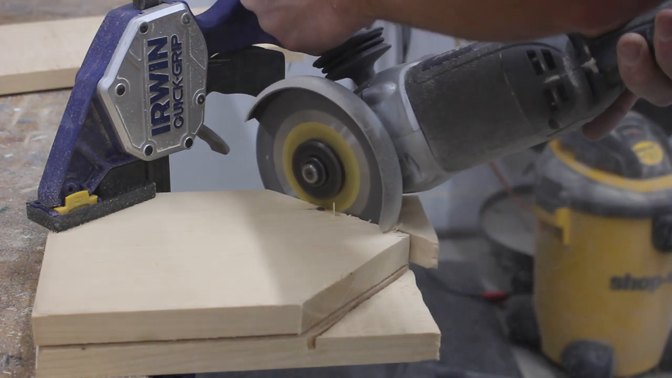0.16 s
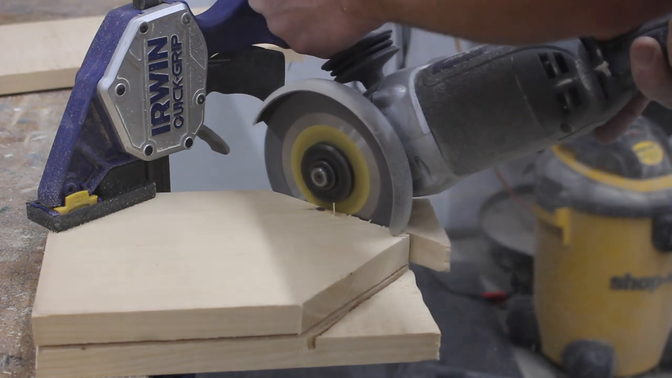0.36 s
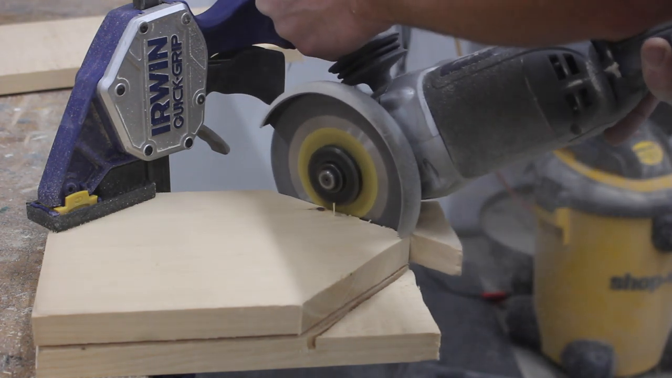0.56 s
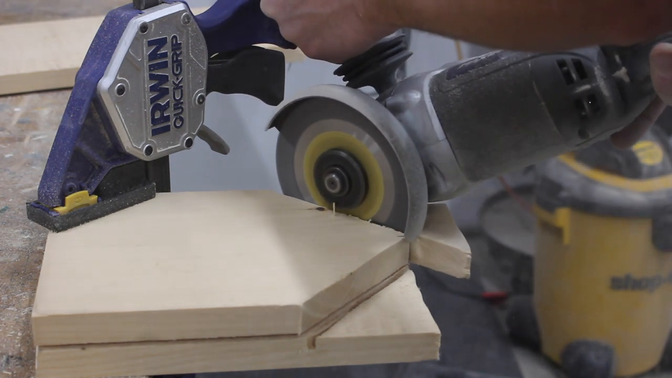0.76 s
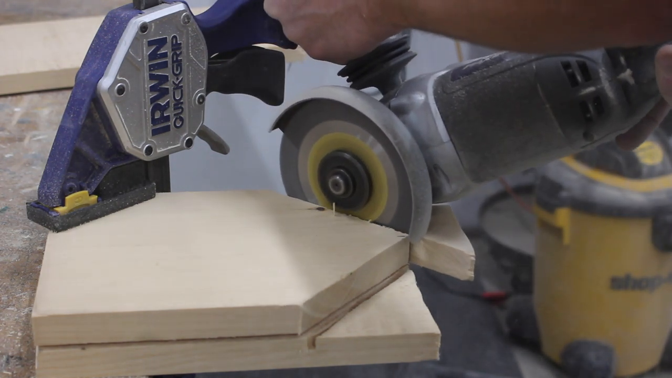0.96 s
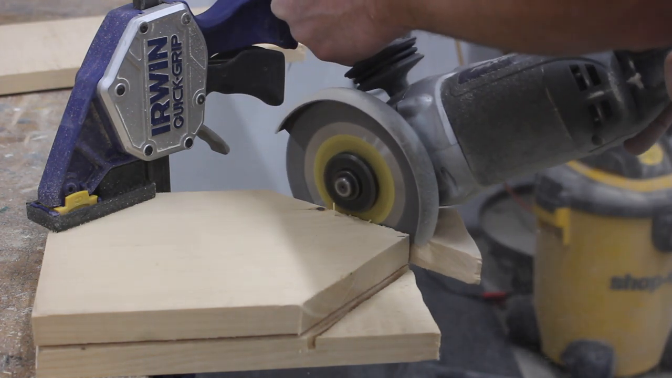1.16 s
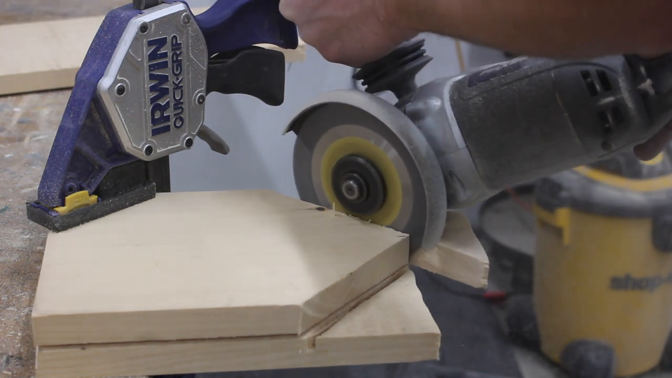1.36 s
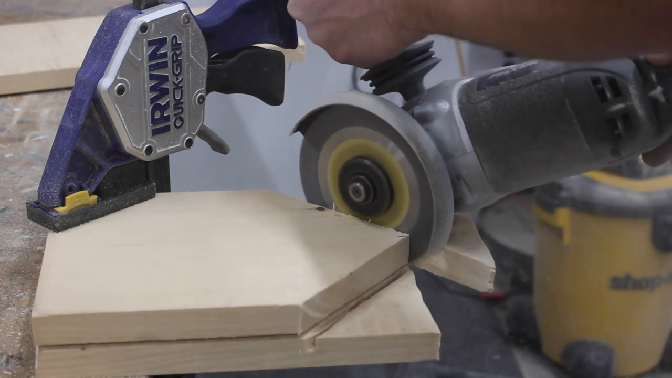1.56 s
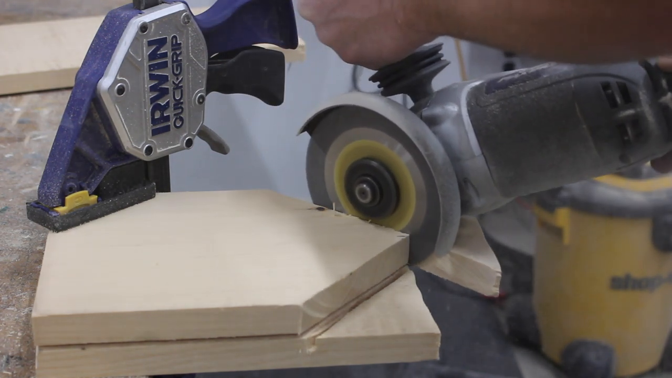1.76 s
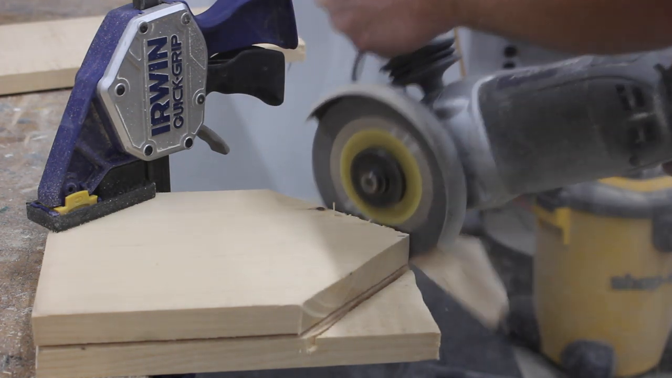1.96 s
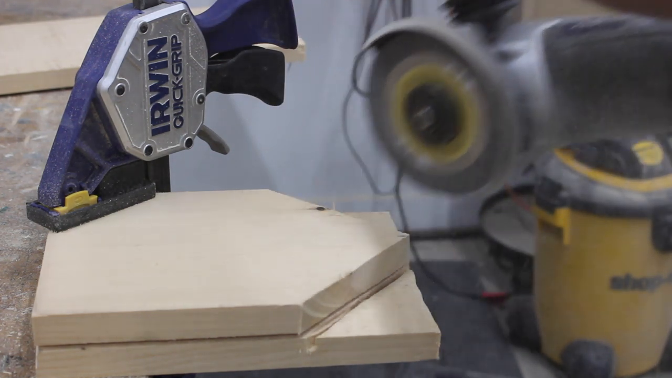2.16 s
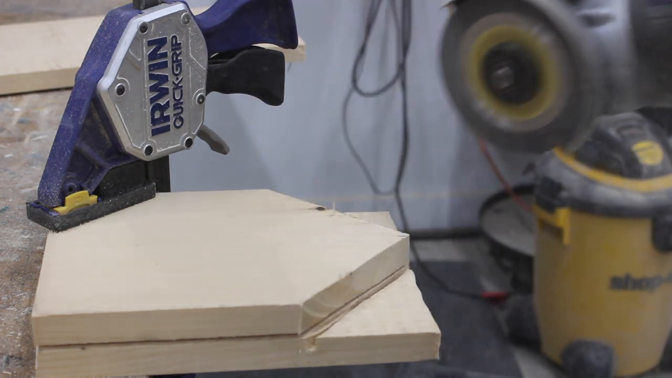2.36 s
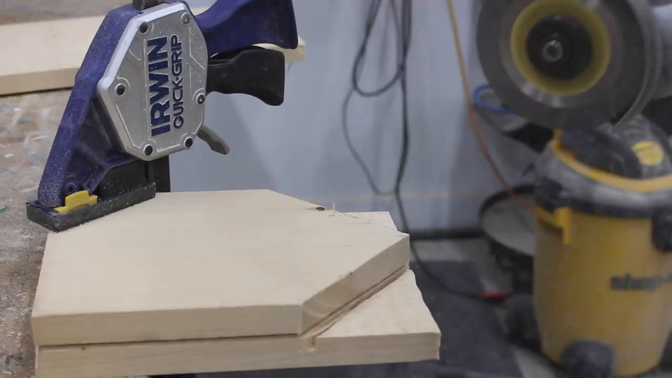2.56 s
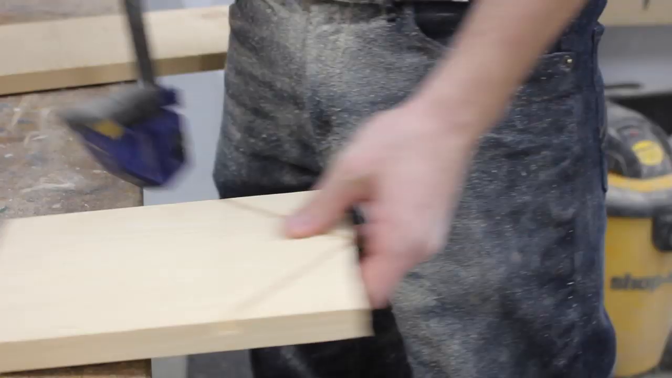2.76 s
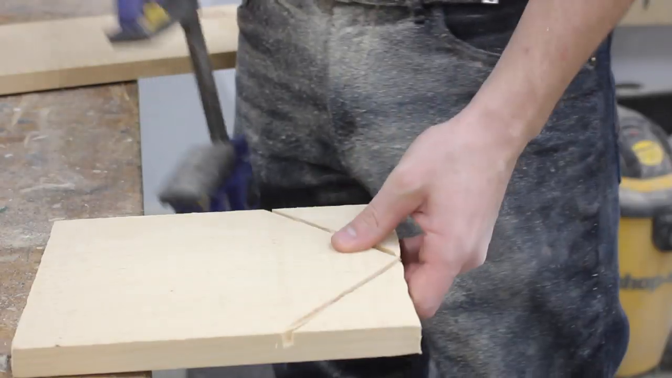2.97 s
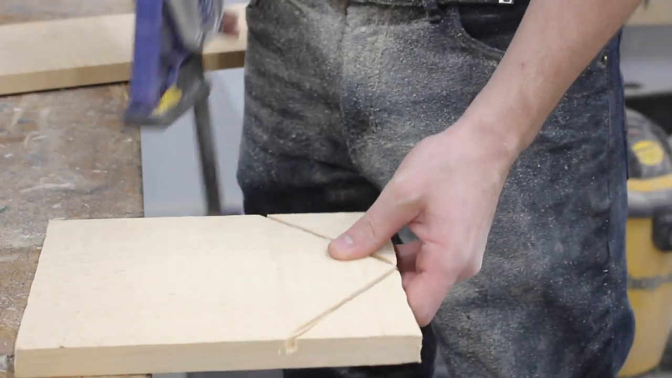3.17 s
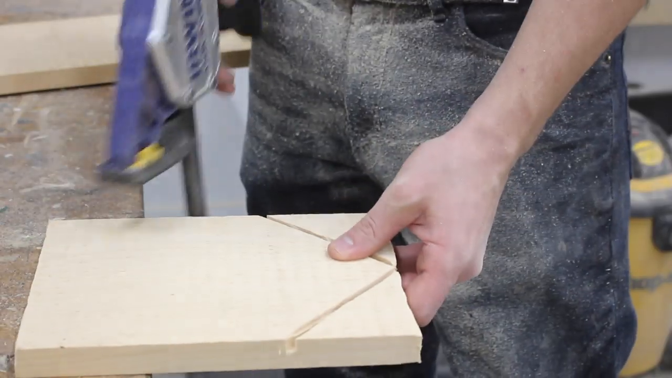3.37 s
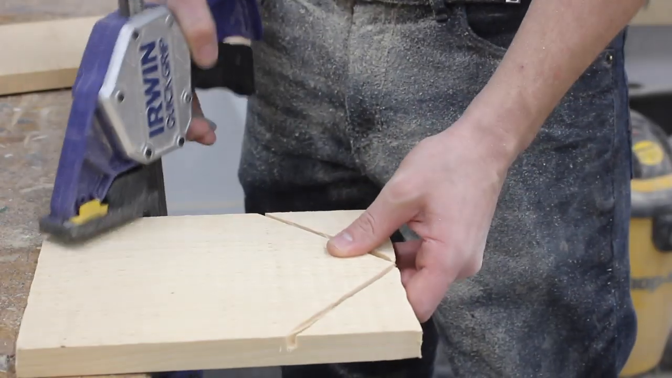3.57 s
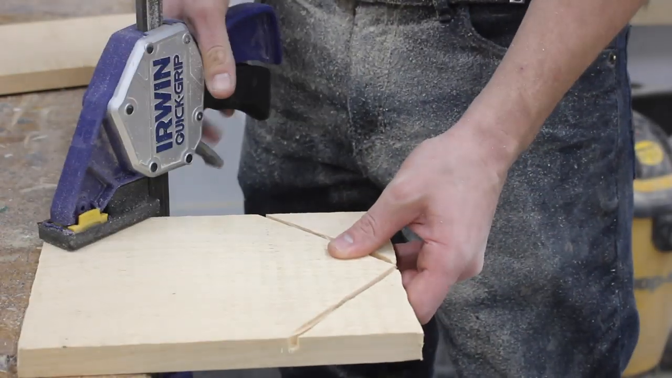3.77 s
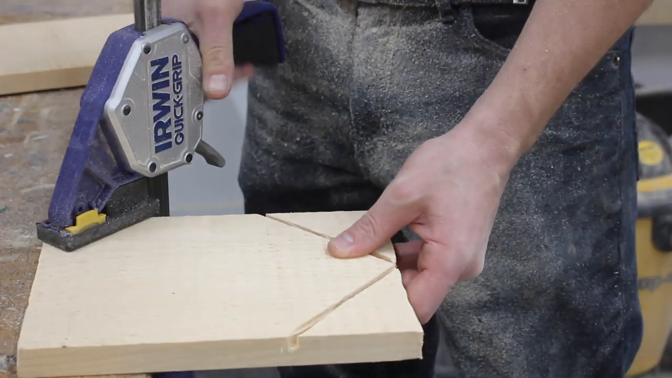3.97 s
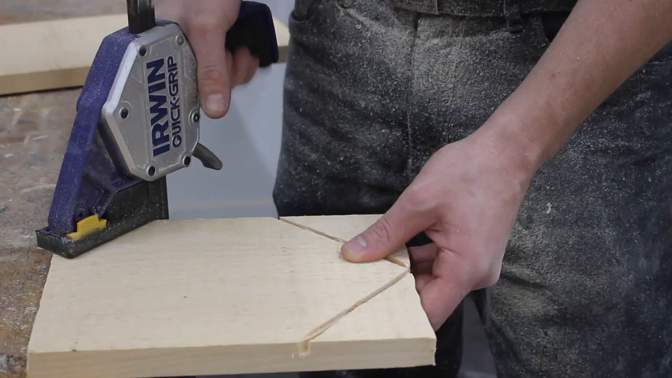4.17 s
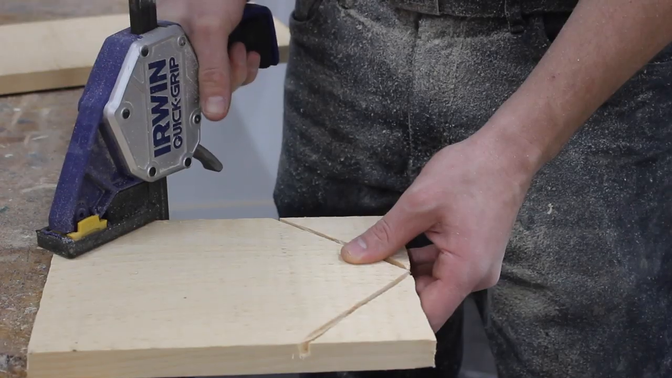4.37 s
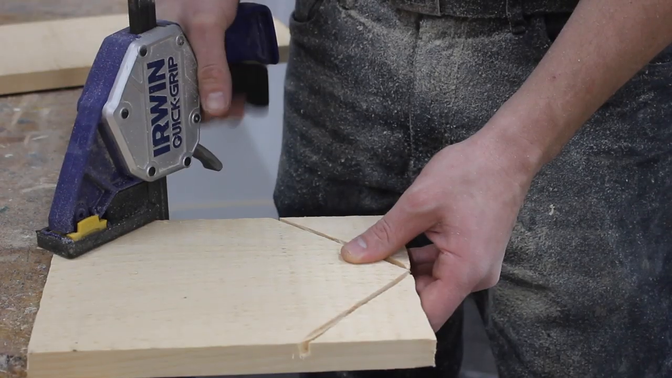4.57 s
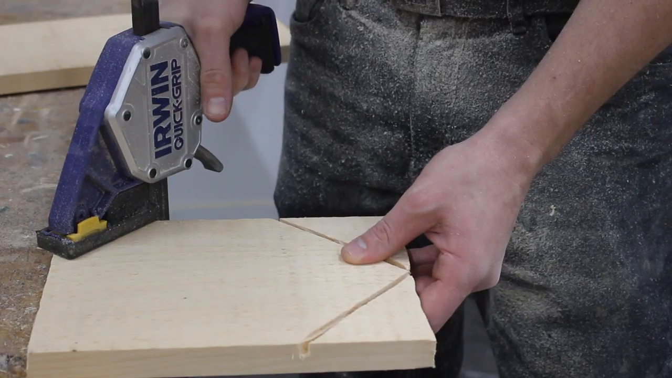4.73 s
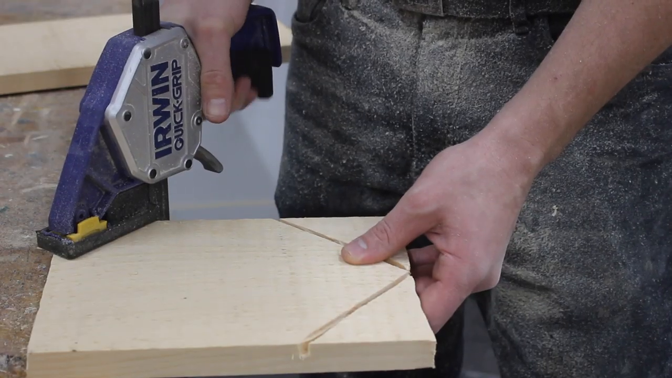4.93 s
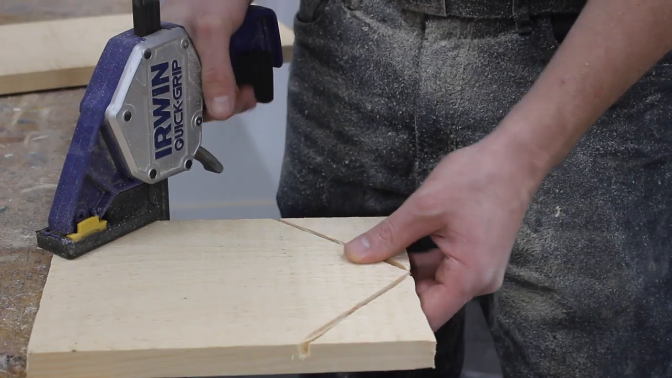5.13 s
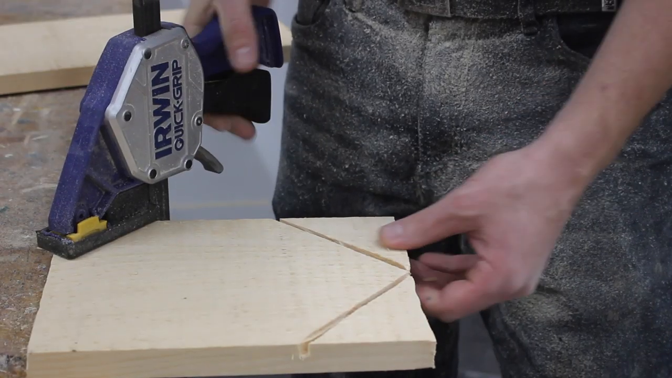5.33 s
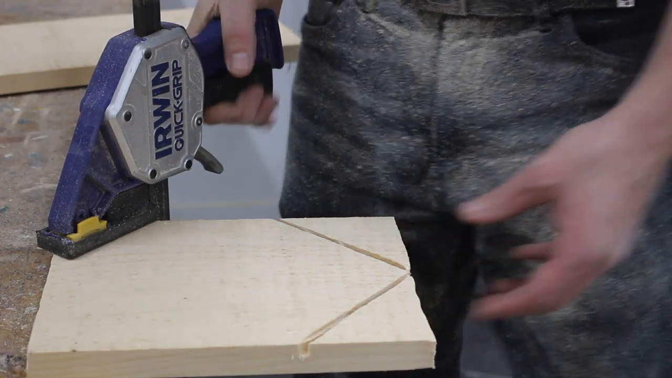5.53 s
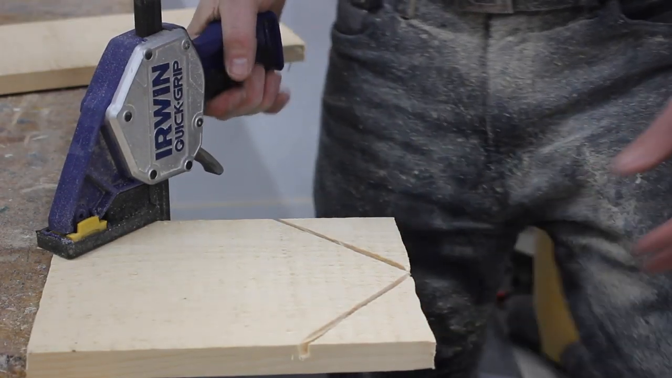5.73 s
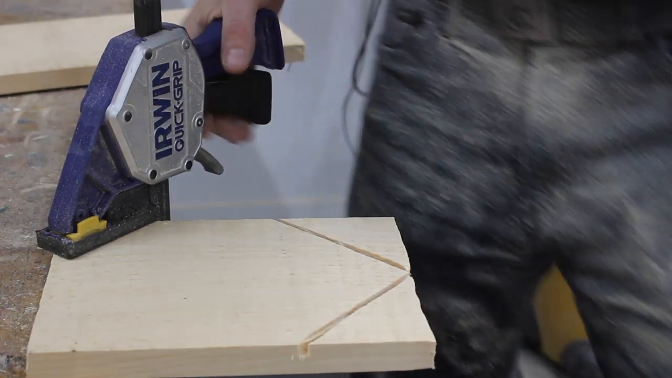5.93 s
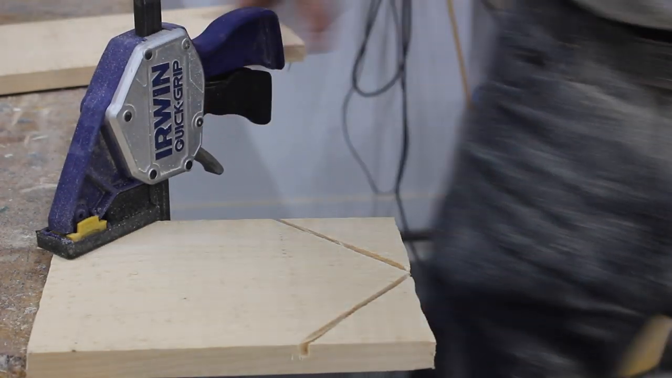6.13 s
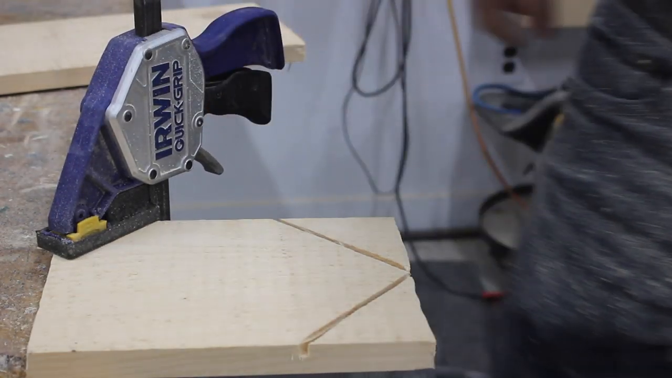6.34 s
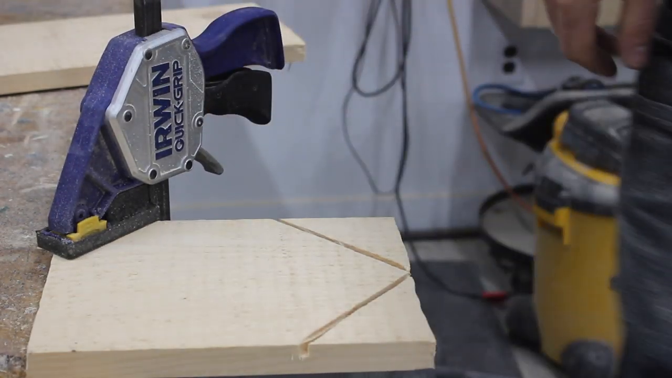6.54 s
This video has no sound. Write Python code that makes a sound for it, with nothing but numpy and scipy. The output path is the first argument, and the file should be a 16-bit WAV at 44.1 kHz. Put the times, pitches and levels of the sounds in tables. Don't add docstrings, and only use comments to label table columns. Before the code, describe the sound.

From 0 to about 2 seconds an angle grinder cuts wood at close range, a loud, wavering scream of many whining tones over dense fibrous rasp, with sharp chip ticks near 0.3, 0.7 and 1.6. Around 2.0 it breaks free and is switched off; the whine slides down and thins while loose gears rattle in the housing, until an abrupt cut at 2.85. Quiet handling follows in a small workshop. Faint clicks at 3.1 and 3.3 precede a hard plastic-and-wood knock at 3.57, with the pad grinding briefly on the grain. From 3.8 to 5.3 the clamp is squeezed: bright snaps at 4.04, 4.37 and 4.68, clacks, squeaky scuffs, lever drops at 5.0 and 5.64, bench thumps and faint steel ringing. Soft rustling continues, with a firm knock at 6.0, then a tiny click near 6.44 over low machine hum.

```python
import sys
import numpy as np
from scipy import signal
from scipy.fft import rfft, irfft
from scipy.io import wavfile

SR = 44100
rng = np.random.default_rng(int(sys.argv[2]) if len(sys.argv) > 2 else 0)


def generate_wav(sig):
    pcm = np.round(np.clip(np.atleast_2d(sig).T, -1, 1) * 32767).astype(np.int16)
    wavfile.write(sys.argv[1], SR, pcm)


def to_linear_factor(level_db):
    exponent = np.asarray(level_db, float) / 20
    return 10 ** exponent


N = 291060
TIME = np.arange(N) / SR

# time in seconds, turns per second.
SPINDLE = [(0, 173.7), (.29, 173.5), (.43, 172.3), (.7, 170.6), (.86, 168.7), (1.8, 168.4), (1.96, 170.8)]
# time in seconds, level in dB.
LOAD = [(0, -20.5), (.43, -20), (1.39, -22), (1.95, -22), (2.07, -23.5), (2.19, -24), (2.82, -24.5)]
# frequency in Hz, level in dB per Hz.
RASP_CUT = [(53, -69), (90, -42), (161, -30), (238, -27), (343, -20), (399, -21.5), (454, -15), (745, -12),
            (1010, -7.5), (1250, -11.5), (1360, -9), (4760, -3), (7990, -9), (10800, -7.5), (15600, -24.5)]
RASP_FREE = [(53, -78), (90, -47.5), (350, -22.5), (435, -18), (505, -18.5), (867, -8.5), (1660, -12.5),
             (1840, -8), (3160, -6.5), (4280, -2), (5540, -7.5), (7330, -3.5), (8530, -10.5), (10400, -2.5),
             (15600, -31)]
RASP_EDGES_HZ = [40, 850, 6300, 19000]
# order, top in dB, loudest moment in seconds, swing in dB.
ORDERS_IN_CUT = [(1, -57, 1.4, 1), (2, -51.5, 1.0, 4), (2.72, -49.5, .7, 10), (3, -47, 1.0, 12),
                 (6, -43, 1.0, 4), (8, -46, 1.4, 4), (9, -39, .4, 12), (12, -40, .2, 5), (13, -38, .2, 8),
                 (15, -33.5, .2, 6.5), (16, -32, .12, 18), (18, -43, .1, 3), (20, -39, 0, 14),
                 (21, -35.5, .1, 14), (22, -44, .1, 4), (24, -43, 1.4, 1), (27, -43, 1.4, 3),
                 (28, -41, .2, 8), (29, -47, 1.4, 8), (33, -44, 1.1, 7), (36, -48, 1.1, 9),
                 (51, -53, 1.4, 4), (63, -54, 1.3, 12), (69, -55, 1.4, 7), (81, -60, 1.3, 7)]
SURGING = [2, 9, 15, 63]
# time in seconds, level in dB.
GEAR = [(0, -36.5), (.4, -41), (.6, -44), (.75, -54), (.86, -40), (1.25, -47), (1.8, -50), (1.93, -43),
        (2.07, -39), (2.2, -49), (2.33, -56), (2.5, -51), (2.62, -56), (2.85, -63)]
# order, time in seconds, level in dB.
FLARES = [(6, 1.98, -40), (6, 2.08, -41), (21, 2.07, -38), (22, 2.05, -35), (22, 1.48, -37),
          (22, 1.72, -38), (22, 1.88, -36), (27, 2.08, -35), (19, .5, -41), (19, .64, -41), (15, 1.4, -41),
          (15, 1.62, -41), (13, 1.4, -41), (13, .4, -38), (29, .95, -30), (32, .95, -37), (26, 1.12, -40),
          (29, 1.66, -37), (29, 1.76, -32), (32, 1.75, -39), (25, 2.06, -36), (28, 2.03, -35),
          (27, 2.33, -39), (28, 2.42, -40), (29, 2.52, -39), (28, 2.6, -40), (30, 2.6, -41)]
# time in seconds, level in dB.
BLADE_NOTE = [(.33, -60), (.42, -34), (.5, -37), (.6, -36), (.68, -43), (.8, -37), (.96, -35), (1.03, -70)]
# frequency in Hz, width in Hz, level in dB.
GUARD = [(4410, 340, 0.5), (4970, 260, 5), (6300, 400, -5), (7050, 260, -2), (10200, 700, -5)]
# time in seconds, level in dB.
GUARD_LOW = [(2.6, 3), (2.7, -9)]
# time in seconds, peak in dB.
CHIPS = [
    (0.0893, -10),
    (0.2824, -6),
    (0.296, -7),
    (0.678, -9),
    (0.713, -10),
    (0.7376, -4.5),
    (1.5894, -8),
    (1.6811, -9),
]
# time in seconds, peak in dB.
SLACK = [(2.0358, -15), (2.0622, -12), (2.0807, -8), (2.1005, -9), (2.1292, -13), (2.157, -11),
         (2.1834, -13), (2.205, -10), (2.285, -14), (2.298, -14), (2.3217, -14), (2.334, -13), (2.352, -15),
         (2.385, -10), (2.406, -10), (2.4229, -12), (2.4423, -10), (2.4658, -11), (2.4886, -12),
         (2.5102, -18), (2.531, -13), (2.576, -12.5), (2.6196, -11.5), (2.6395, -11), (2.6853, -12),
         (2.7057, -15), (2.728, -10), (2.7456, -17), (2.7691, -18), (2.784, -15), (2.8322, -11)]
# frequency in Hz, level in dB, t60 in seconds.
HOUSING = [(4720, -4, 0.0074), (4860, -3, 0.029), (6120, -2, .008), (6600, -1, 0.0093), (7210, 0.5, 0.015),
           (7400, -6, 0.005), (7720, -5.5, 0.0054), (10200, 4.5, 0.006), (10540, 5.5, 0.0051),
           (11100, 1, 0.0044)]

SWITCH_OFF_S, AIR_DRAG_PER_S = 2.04, .298
CUT_S, CUT_FADE_S = 2.852, 0.0097
LIMIT = .36
BLADE_HZ, BLADE_WANDER_TURNS = 3308, .12
DEPTH_SPAN_S, SURGE_DB, SINK_DB = 0.58, 0, -10
BREAK_OUT_S, COAST_S = [1.83, 2.02], [2.095, 2.09]
COAST_DB, COAST_DB_PER_ORDER, UNBAFFLED_DB = -53, -.6, -16.5
RING_HZ, RING_WIDTH_HZ = 3298, 14
RING_DB, RING_REST_DB = -23, -51
FLARE_S = .05
AIR_DB, AIR_FOLLOWS, DRONE_DB, DRONE_FOLLOWS = -36, 1.6, -43.5, 0.69
TOOTH_PATTERN = .38
GUARD_DB = -48
TICK_TOP_DB, TICK_TOP_DB_PER_S = -15, -8

# time in seconds, peak in dB, bench in dB.
SNAPS = [(3.09, -43, -59), (3.2948, -27, -56), (3.5744, -6, -35), (3.714, -19.5, -38), (3.8124, -20.5, -23),
         (3.8562, -17.5, -48), (3.8663, -14.5, -48), (3.8765, -21, -47), (4.0424, -8.5, -37),
         (4.0835, -20, -50), (4.338, -14.5, -40), (4.399, -30, -50), (4.374, -3.5, -31),
         (4.6784, -5, -25.5), (4.8712, -22.5, -50), (5.9024, -27, -40), (5.9683, -26, -41),
         (6.009, -9, -17), (6.442, -27, -59)]
# time in seconds, peak in dB, bench in dB.
TAPS = [(3.2908, -31, -38.5), (3.4353, -35, -50), (3.5711, -8.5, -15.5), (4.0298, -30, -34),
        (4.0835, -25, -37), (3.3015, -34, -33.5), (3.64, -25, -40), (3.696, -27, -46), (3.792, -28, -37),
        (4.3645, -26, -41), (4.8708, -25, -25), (5.537, -41, -30), (4.3507, -27, -44), (4.4417, -28, -20),
        (6.194, -32, -41)]
# time in seconds, peak in dB, bench in dB.
LEVER_DROPS = [
    (4.2239, -29, -28),
    (4.2848, -19.5, -28),
    (4.6777, -11.5, -40),
    (4.9918, -6, -21),
    (5.2843, -17, -40),
    (5.6357, -7, -20.5),
]
# time in seconds, peak in dB, bench in dB.
CLACKS = [
    (4.5846, -26, -21),
    (4.6258, -12.5, -19),
    (4.9071, -29, -22.5),
    (5.2844, -15, -13),
]
# time in seconds, peak in dB, bench in dB.
TICKS = [
    (4.253, -41, -70),
    (5.0083, -45, -70),
    (5.2617, -40, -73),
    (5.3964, -39, -70),
    (5.6538, -36, -70),
    (5.8773, -44, -73),
    (5.9806, -39, -70),
    (6.0474, -42, -70),
]
# time in seconds, peak in dB.
CATCHES = [
    (3.814, -25),
    (4.321, -24),
    (4.0425, -6),
    (4.0565, -27),
    (4.374, -10.5),
    (4.6258, -12.5),
    (4.6784, -11.5),
    (4.237, -20.5),
    (4.292, -19),
    (4.304, -18),
]
# time in seconds, peak in dB.
NUDGES = [
    (4.2243, -23.5),
    (4.237, -32),
    (4.2851, -17),
    (4.295, -25),
    (4.446, -32),
    (5.537, -30.5),
    (5.556, -36),
    (5.573, -37),
]
# time in seconds, Hz, level in dB, t60 in seconds.
BAR_RINGS = [(3.866, 9150, -50, 0.2), (4.7, 133, -30, .6), (4.99, 1175, -34, .7), (5.286, 1020, -39, 0.65),
             (5.637, 1165, -33, .8), (5.291, 341, -21, .5), (5.3, 172, -28, .35), (3.571, 1500, -15, .03),
             (5.178, 350, -38, .4), (6.018, 175, -26, .4), (3.7, 179, -23, .35), (3.578, 179, -26, .3),
             (3.434, 2455, -31, .025), (3.434, 1100, -32, .035), (4.084, 2230, -29, .1),
             (5.538, 570, -30, .1)]
# frequency in Hz, level in dB, t60 in seconds.
PLASTIC = [(2910, 6, 0.0051), (3290, 2.5, 0.0072), (3960, 0.5, 0.011), (4700, -7.5, 0.019),
           (5220, 5.5, 0.0046), (6200, -6, 0.013)]
WOOD = [(720, -3.5, 0.018), (1057, 7, 0.0087), (1490, -5, 0.018), (1920, 3, 0.013)]
STEEL = [(7340, 3.5, 0.0064), (8950, 2.5, 0.0027), (10080, -0.5, 0.0038), (12400, -15, 0.0014),
         (15200, -17, 0.00092)]
BENCH = [(130, -3, .18), (178, 0, .2), (220, -5, .15), (293, -3, .16), (342, -1, .18), (418, -5, .12)]
GRIP = [(750, -9.5, 0.019), (1122, 0, 0.02), (2060, -11.5, 0.027), (3430, -6, 0.012)]
PAWL = [(5400, 2, 0.0072), (6000, -3.5, 0.011)]
JAW = [(338, -5, 0.048), (477, -9.5, 0.023), (710, -2, 0.026), (956, 1, 0.025), (1300, -10, 0.011)]
# start and hold in seconds, then bench boom, board drag and bar slide in dB.
MOVES = [(2.833, 0.052, -45.5, -51, -50), (3.281, 0.023, -47, -44.5, -50), (3.419, 0.031, -60, -52, -56.5),
         (3.567, 0.14, -31, -30, -35.5), (3.69, 0.033, -30.5, -35, -46), (3.852, 0.036, -47, -46, -42.5),
         (4.073, 0.032, -39, -38.5, -35.5), (4.214, 0.022, -41, -44, -45), (4.28, 0.036, -34, -45, -37.5),
         (4.37, .05, -38, -43, -41), (4.429, .05, -35.5, -38.5, -35), (4.568, 0.11, -30.5, -42, -46),
         (4.72, 0.081, -35.5, -38, -37), (4.854, 0.047, -40, -39.5, -47), (4.933, 0.095, -32.5, -52, -43.5),
         (5.158, 0.18, -38, -43, -48), (5.287, 0.11, -31.5, -42.5, -41.5), (5.525, 0.037, -39, -55, -58),
         (5.621, 0.048, -37, -38, -39), (5.78, 0.42, -46.5, -46.5, -44.5), (5.994, 0.068, -32, -40, -40),
         (6.18, 0.12, -51, -43, -38)]
# frequency in Hz, level in dB per Hz.
BOOM = [(15, -58), (25, -18), (151, -14.5), (179, -0.5), (256, -12), (285, -6.5), (343, 0.5), (472, -10.5),
        (600, -8), (780, -28), (1320, -120)]
# frequency in Hz, width in Hz, level in dB.
DRAG = [(640, 400, -4.5), (1105, 420, 0), (1480, 460, -2), (1990, 730, -7)]
SLIDE = [(2320, 1000, -5.5), (3640, 380, -3), (4030, 210, 2.5), (5200, 1500, -2), (6310, 1240, -3.5),
         (8340, 4600, -25)]
# start and end in seconds, level in dB, squeak in dB.
SCUFFS = [(3.855, 3.873, -52, 17.5), (4.046, 4.05, -38, 6), (4.218, 4.24, -43, 7.5), (4.268, 4.284, -47, 0),
          (4.286, 4.322, -38, 4), (4.382, 4.41, -49, 0), (4.564, 4.58, -46, 0), (4.582, 4.615, -38, 2),
          (4.628, 4.64, -45, 16), (4.69, 4.74, -53, 0), (4.856, 4.87, -53, 0), (4.912, 4.935, -37, 2.5),
          (4.995, 5.09, -51, -8), (5.173, 5.185, -46.5, 7), (5.258, 5.278, -44.5, 4), (5.31, 5.45, -50, -8),
          (5.65, 5.71, -49, -5), (5.735, 5.77, -47.5, 10), (5.81, 5.96, -52, 0), (5.972, 6.013, -45, 4),
          (6.013, 6.125, -47.5, -4), (6.161, 6.27, -46.5, 6), (6.278, 6.325, -45, 11)]
# frequency in Hz, level in dB per Hz.
SCUFF = [(5500, -21), (6900, 2), (8000, -9), (8800, 0), (9600, -5), (10300, 0), (11100, -5), (12800, -7),
         (14200, -19), (15700, -21)]
RUSTLE = [(5500, -20), (7000, 1), (8600, -6), (9400, -3), (11300, -1), (12500, -6), (14500, -12),
          (15800, -22)]
# frequency in Hz, width in Hz, level in dB.
SQUEAK = [(2830, 3100, -4), (4540, 1230, 1), (5900, 610, 0.5)]
# frequency in Hz, width in Hz, level in dB.
SEAT = [(810, 160, -3.5), (1510, 380, 1.5)]
# time in seconds, level in dB.
SEATING = [(3.572, -90), (3.58, -27), (3.62, -36), (3.66, -27), (3.72, -38), (3.85, -40.5), (4.0, -57),
           (4.05, -86)]
# time in seconds, level in dB.
ROOM_TONE = [(2.85, -56), (3.25, -64.5), (3.6, -56.5), (4.5, -48.5), (5.5, -45.5), (6.6, -45.5)]
# frequency in Hz, level in dB per Hz.
TONE = [(15, -47), (25, -16), (126, -22), (240, -5.5), (332, -15.5), (369, -14.5), (584, -16.5),
        (2570, -22.5), (2860, -21), (15600, -32)]
# frequency in Hz, width in Hz, level in dB.
HUM = [(128.8, 3.1, -6), (80, 9.3, -8.5)]

# plastic, wood and steel in dB.
SNAP_MIX, TAP_MIX, CLACK_MIX, DROP_MIX = (0, -11.5, -19.5), (-1.7, 0, -29), (7.7, -4, -2.1), (-12, -17, -42)
TICK_MIX = (-12, -30, 0)
MOVE_ATTACK_S = 0.014
SAG_DB_PER_S, RELEASE_DB_PER_S = (46, 6, 2), (80, 59.5, 71)
RUSTLE_FROM_S = 5.6
ROOM_T60_S, ROOM_DB = 0.57, -14.5
TOP_HZ, TOP_LEAK_DB = 16080, -22


def rms_one(x):
    return x / np.sqrt(np.mean(x ** 2) + 1e-20)


def in_time(rows):
    s, *columns = np.transpose(rows)
    return [np.interp(TIME, s, c) for c in columns]


def drift(rate, size=N):
    r = np.exp(-80 * np.pi * rate / SR)
    chance = rng.standard_normal(size // 40 + 2002)
    slow = signal.lfilter([1], [1, -2 * r, r * r], chance)[2000:]
    return np.interp(np.arange(size) / 40, np.arange(len(slow)), rms_one(slow))


def coloured(x, spectrum):
    hz, level_db = np.transpose(spectrum)
    grid = np.maximum(np.fft.rfftfreq(N, 1 / SR), 1)
    gain = to_linear_factor(np.interp(np.log(grid), np.log(hz), level_db))
    return rms_one(irfft(rfft(x) * gain, N))


def band(x, low_hz, high_hz):
    return signal.sosfilt(signal.butter(3, [low_hz, high_hz], "band", fs=SR, output="sos"), x)


def grains(per_s, spread_db):
    sizes = to_linear_factor(spread_db * np.minimum(rng.exponential(1, N), 4)) * rng.choice([-1, 1], N)
    contacts = rms_one(sizes * (rng.random(N) < per_s / SR))
    return contacts + .5 * rng.standard_normal(N)


def resonate(x, peaks):
    out = 0
    for k, (hz, width_hz, level_db) in enumerate(peaks):
        r = np.exp(-np.pi * width_hz / SR)
        poles = [1, -2 * r * np.cos(2 * np.pi * hz / SR), r * r]
        gain = (-1) ** k * to_linear_factor(level_db) * (1 - r * r)
        out = out + gain * signal.lfilter([1, 0, -1], poles, x)
    return rms_one(out)


def strike(seconds, peak_db, modes, scatter_db, contact_s):
    at, out = (np.array(seconds) * SR).astype(int), np.zeros(N)
    luck = rng.standard_normal((len(at), len(modes)))
    span = np.arange(int(3 * contact_s * SR) + 1)
    for k, (hz, level_db, t60) in enumerate(modes):
        chatter = rng.standard_normal((len(at), len(span))) * np.exp(-span / (contact_s * SR))
        r, w = to_linear_factor(-60 / (t60 * SR)), 2 * np.pi * hz / SR
        drive = np.abs(chatter @ np.exp(1j * w * span)) ** 2
        chatter /= np.sqrt(drive + .15 * np.sum(chatter ** 2, axis=1))[:, None]
        blow_gain = to_linear_factor(peak_db + level_db + scatter_db * luck[:, k])
        force = np.full(N + len(span), 1e-18)
        np.add.at(force, at[:, None] + span, chatter * blow_gain[:, None])
        out += signal.lfilter([.5, 0, -.5], [1, -2 * r * np.cos(w), r * r], force[:N])
    return out


def grinder():
    tremble = np.interp(TIME, [1.85, 2.1], [.001, .0018]) * drift(40)
    speed = in_time(SPINDLE)[0] / (1 + AIR_DRAG_PER_S * np.maximum(TIME - SWITCH_OFF_S, 0))
    turns = np.cumsum(speed) / SR + tremble
    blade_turns = BLADE_HZ * TIME + BLADE_WANDER_TURNS * drift(9.3)
    note = np.sqrt(2) * np.sin(2 * np.pi * blade_turns) * to_linear_factor(in_time(BLADE_NOTE)[0])
    loud = to_linear_factor(1.0) * (whine(turns, speed) + flares(turns) + note + rasp(turns) + rattle())
    held = LIMIT * np.tanh(loud / LIMIT)
    running = np.clip((CUT_S - TIME) / CUT_FADE_S, 0, 1)
    return band(held, 55, 19000) * running


def whine(turns, speed):
    size = 3 * SR
    t, turns, speed = TIME[:size], turns[:size], speed[:size]
    out, coast = np.interp(t, BREAK_OUT_S, [0, 1]), np.interp(t, COAST_S, [0, 1])
    lines = []   # order, level in dB, waver in dB
    for k, top_db, at, swing_db in ORDERS_IN_CUT:
        cutting_db = top_db - swing_db * (1 - np.exp(-((t - at) / DEPTH_SPAN_S) ** 4))
        out_db = top_db + (SURGE_DB if k in SURGING else SINK_DB)
        coast_db = min(COAST_DB, out_db) + COAST_DB_PER_ORDER * k + UNBAFFLED_DB * (k <= 2)
        level_db = 1.5 + cutting_db + out * (out_db - cutting_db) + coast * (coast_db - out_db)
        lines.append((k, level_db, 1.7))
    tuned = np.exp(-((19 * speed - RING_HZ) / RING_WIDTH_HZ / 2) ** 2)
    ring_db = RING_REST_DB + (RING_DB - RING_REST_DB) * tuned - 9 * coast
    lines += [(19, ring_db, .7), (57, in_time(GEAR)[0][:size], 3.0)]
    tones = np.zeros(size)
    for k, db, waver_db in lines:
        gain = np.sqrt(2) * to_linear_factor(db + waver_db * drift(9.0, size=size))
        tones += gain * np.sin(2 * np.pi * (k * turns + rng.random()))
    return np.pad(tones, (0, N - size))


def flares(turns):
    out = np.zeros(N)
    for k, at, level_db in FLARES:
        near = slice(int((at - 3 * FLARE_S) * SR), int((at + 3 * FLARE_S) * SR))
        swell_db = level_db - 3.6 * ((TIME[near] - at) / FLARE_S) ** 2
        out[near] += np.sqrt(2) * to_linear_factor(swell_db) * np.sin(2 * np.pi * (k * turns[near] + rng.random()))
    return out


def rasp(turns):
    rasp_db, = in_time(LOAD)
    air_db = AIR_DB + AIR_FOLLOWS * (rasp_db + 22)
    drone_db = DRONE_DB + DRONE_FOLLOWS * (rasp_db + 22)
    free = np.interp(TIME, [2.0, 2.14], [0, 1])
    once_a_turn = 1 + 0.15 * (1 - free) * np.cos(2 * np.pi * turns)
    source = grains(9000, 1.5) * once_a_turn * to_linear_factor(0.75 * drift(40))
    wear = np.pi * np.cumsum(np.abs(drift(2.9))) / SR
    tooth, patterns = (turns % 1 * 256).astype(int), rng.standard_normal((2, 256))
    bite = np.cos(wear) * patterns[0, tooth] + np.sin(wear) * patterns[1, tooth]
    source = source + TOOTH_PATTERN * bite
    noise = np.sqrt(1 - free) * coloured(source, RASP_CUT) + np.sqrt(free) * coloured(source, RASP_FREE)
    edges = zip(RASP_EDGES_HZ, RASP_EDGES_HZ[1:])
    drone, tear, air = (rms_one(band(noise, low, high)) for low, high in edges)
    flutter_db = (.5 + 2.1 * free) * drift(90)
    rings = resonate(source, GUARD[:1]) * to_linear_factor(in_time(GUARD_LOW)[0]) + resonate(source, GUARD[1:])
    guard = free * rings * to_linear_factor(GUARD_DB + 0.5 * flutter_db)
    return guard + drone * to_linear_factor(drone_db) + tear * to_linear_factor(rasp_db - 2.5) + air * to_linear_factor(air_db + flutter_db)


def rattle():
    s, peak_db = np.transpose(CHIPS + SLACK)
    top_db = TICK_TOP_DB + np.where(s > SWITCH_OFF_S, TICK_TOP_DB_PER_S * (s - SWITCH_OFF_S), -5)
    body = strike(s, peak_db - 9.5, HOUSING[:7], 2.0, .003)
    top = strike(s, peak_db + top_db - 3, HOUSING[7:], 2.0, .003)
    return band(body + top, 2230, 14700)


def knocks():
    kinds = [(SNAPS, SNAP_MIX), (TAPS, TAP_MIX), (LEVER_DROPS, DROP_MIX), (CLACKS, CLACK_MIX), (TICKS, TICK_MIX)]
    blows = []
    for rows, mix in kinds:
        blows += [(at, *(db + np.array(mix)), bench_db) for at, db, bench_db in rows]
    s, plastic_db, wood_db, steel_db, bench_db = np.transpose(blows)
    snap = band(strike(s, plastic_db - 7.0, PLASTIC, 0.79, .0008), 1170, 9300)
    crack = band(strike(s, steel_db + 4.5, STEEL, 2.4, .001), 5800, 22000)
    board = band(strike(s, wood_db - .5, WOOD, 1.3, .0006), 290, 3170)
    thump = band(strike(s + 0.0061, bench_db - 11.5, BENCH, 2.0, .0005), 34, 1040)
    grip = band(strike(*np.transpose(LEVER_DROPS)[:2], GRIP, 1.0, .0001), 350, 4600)
    pawl = band(strike(*np.transpose(CATCHES), PAWL, 1.0, .0001), 3000, 8500)
    nudge = band(strike(*np.transpose(NUDGES), JAW, 1.9, .0002), 200, 2200)
    return nudge + snap + crack + board + thump + grip + pawl


def singing_bar():
    sung = np.zeros(N)
    for at, hz, level_db, t60 in BAR_RINGS:
        sung += band(strike([at], level_db, [(hz, 0, t60)], 0, .0001), hz / 2, hz * 2)
    return sung * to_linear_factor(1.2 * drift(30))


def handling():
    on_bench, on_board, on_bar = efforts()
    shake = rng.standard_normal(N)
    bench = resonate(shake, [(hz, 4 / t60, level_db) for hz, level_db, t60 in BENCH])
    boom = rms_one(bench + 0.93 * coloured(shake[::-1], BOOM)) * on_bench * to_linear_factor(1.85 * drift(14.0))
    drag = resonate(grains(1500, 0.67), DRAG) * on_board * to_linear_factor(1.4 * drift(32))
    slide = resonate(grains(4000, 2.5), SLIDE) * on_bar * to_linear_factor(0.4 * drift(29))
    return boom + drag + slide + scuffs() + seating()


def efforts():
    power = np.zeros((3, N))
    for start, hold, *level_db in MOVES:
        first = int(start * SR)
        age = TIME[first:first + SR] - start
        swell = np.clip(age / MOVE_ATTACK_S, 0, 1)
        for k in range(3):
            sag_db = SAG_DB_PER_S[k] * np.clip(age, 0, hold)
            loss_db = sag_db + RELEASE_DB_PER_S[k] * np.maximum(age - hold, 0)
            power[k, first:first + SR] += (swell * to_linear_factor(level_db[k] - loss_db)) ** 2
    return np.sqrt(power)


def scuffs():
    hiss, squeak = np.zeros(N), np.zeros(N)
    for start, end, level_db, squeak_db in SCUFFS:
        shape = np.interp(TIME, [start - .016, start + 0.006, end, end + 0.028], [0, 1, 1, 0]) ** 2
        hiss += shape * to_linear_factor(level_db)
        squeak += shape * to_linear_factor(level_db + squeak_db)
    rub = grains(3300, 0.75) * to_linear_factor(0.5 * drift(60))
    colour = np.where(TIME < RUSTLE_FROM_S, coloured(rub, SCUFF), coloured(rub, RUSTLE))
    return hiss * colour + squeak * resonate(rub, SQUEAK)


def seating():
    grind = resonate(resonate(grains(2500, 1.0), SEAT), SEAT)
    return grind * to_linear_factor(in_time(SEATING)[0] + 1.2 * drift(25))


def workshop(x):
    age = TIME[:SR // 2]
    onset = np.clip((age - .002) / 0.00051, 0, 1)
    echoes = band(rng.standard_normal(len(age)) * to_linear_factor(-60 * age / ROOM_T60_S) * onset, 120, 6500)
    return signal.fftconvolve(x, echoes / np.sqrt(np.sum(echoes ** 2)))[:N]


def room_tone():
    air, hum = rng.standard_normal((2, N))
    return (coloured(air, TONE) + 0.61 * resonate(hum, HUM)) * to_linear_factor(in_time(ROOM_TONE)[0])


def scene():
    blows = knocks()
    after_cut = np.clip((TIME - CUT_S) / CUT_FADE_S + 1, 0, 1)
    under = (handling() + room_tone()) * after_cut
    clamp = blows + singing_bar() + to_linear_factor(ROOM_DB) * workshop(blows) + under
    return (grinder() + clamp)[None]


def top_cut(x):
    return signal.sosfilt(signal.butter(12, 16710, fs=SR, output="sos"), x)


def record(dry):
    rounded = .66 * np.tanh(dry / .66)
    dull = signal.sosfilt(signal.cheby2(20, 60, TOP_HZ, fs=SR, output="sos"), rounded)
    sharp = np.abs(rounded) > .42
    top = signal.sosfilt(signal.butter(6, TOP_HZ, "high", fs=SR, output="sos"), rounded * sharp)
    return top_cut(dull + to_linear_factor(TOP_LEAK_DB) * top)


dry = scene()
out = record(dry)
generate_wav(out)
```